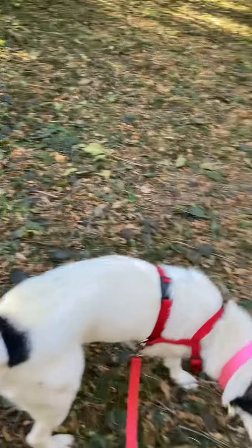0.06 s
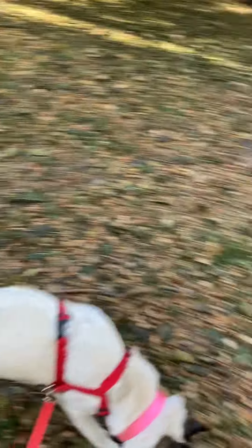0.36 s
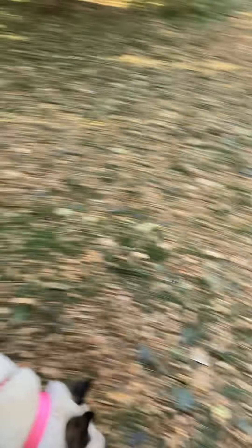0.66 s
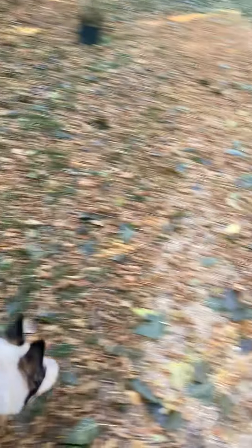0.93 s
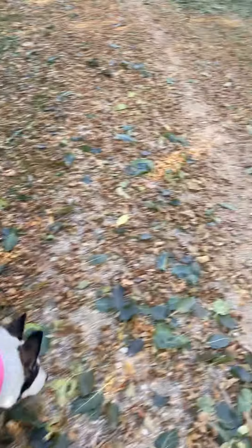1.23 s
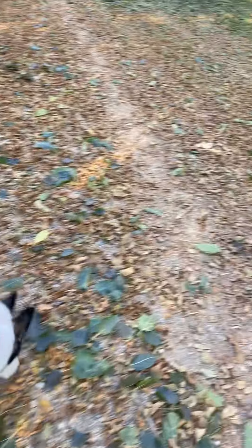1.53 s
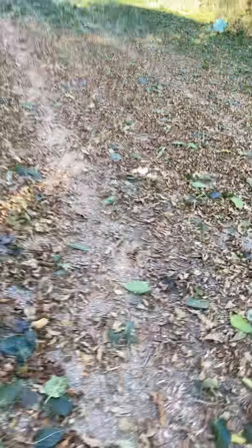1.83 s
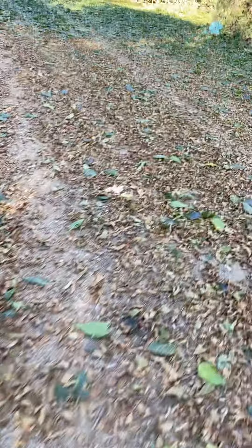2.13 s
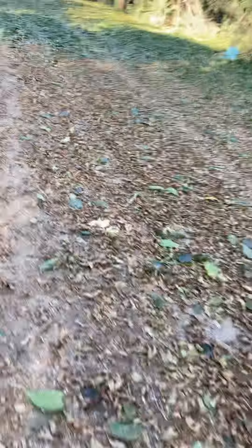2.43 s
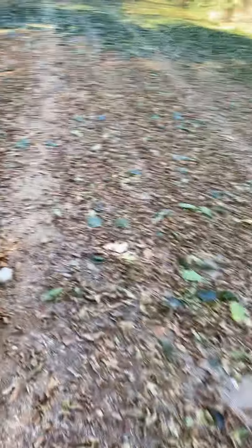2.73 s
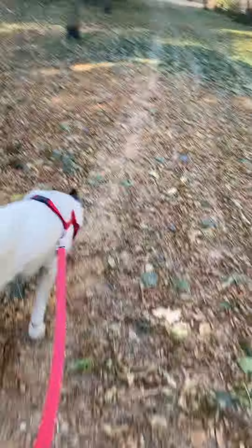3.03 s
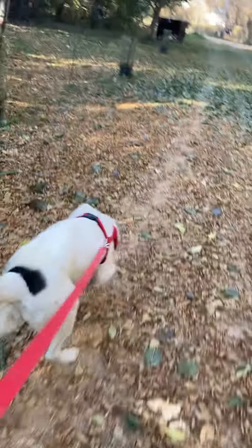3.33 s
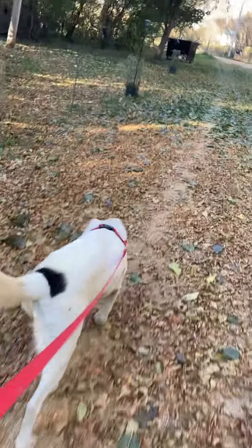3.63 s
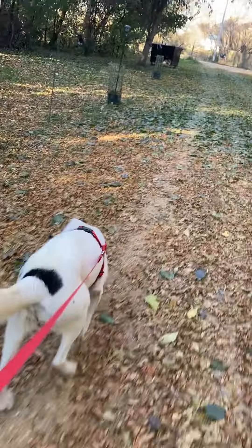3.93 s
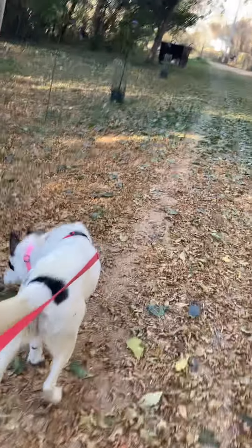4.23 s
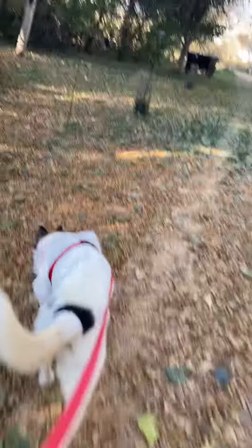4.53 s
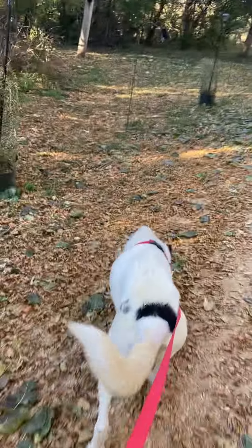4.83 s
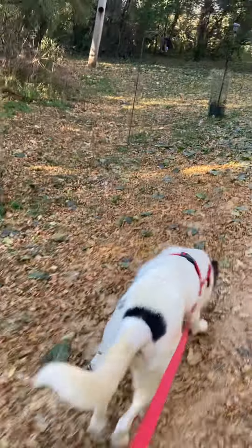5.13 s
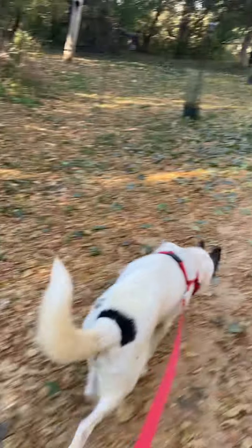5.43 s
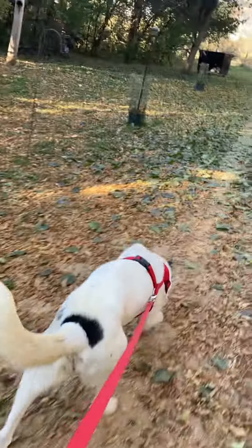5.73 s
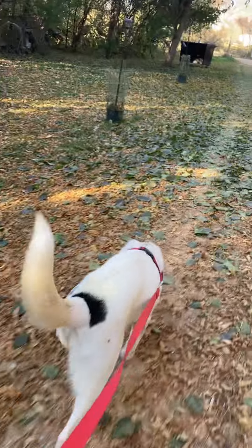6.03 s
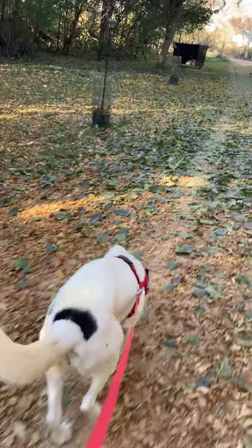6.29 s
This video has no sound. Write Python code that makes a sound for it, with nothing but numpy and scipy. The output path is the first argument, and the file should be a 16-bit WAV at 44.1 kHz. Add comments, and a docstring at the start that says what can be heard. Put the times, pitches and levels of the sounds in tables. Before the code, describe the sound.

Crisp, uneven crunching of shoes and paws in dry leaves runs from start to finish, close to a hand-held phone outdoors. The leaves keep rustling between steps, brittle ones snap, twigs and a leash knock lightly, and heels thud softly on soil. The steps ease briefly past the middle and end with a strong crunch. Underneath are a low wash of air and traffic, a far engine and slight wind flutter.

```python
"""Footsteps of a person and a leashed dog crunch through dry fallen leaves on a woodland path.
Each shoe or paw crushes a crowd of brittle leaves; single leaves snap or cave in, heels and paws thump
on firm soil, and twigs and the leash knock now and then. The litter keeps rustling between steps.
Behind it lie a low wash of air and traffic and a far engine hum. All is heard in stereo from a
hand-held phone, which catches puffs of air as it swings."""
import sys
import numpy as np
from scipy import signal
from scipy.fft import rfft, irfft
from scipy.io import wavfile
from scipy.ndimage import uniform_filter1d

SR = 44100
rng = np.random.default_rng(int(sys.argv[2]) if len(sys.argv) > 2 else 0)


def materialize(psi):
    """Save the field psi as 16-bit PCM at rate SR to the path in sys.argv[1].

    A 1-D psi becomes a single channel; in a 2-D psi each row is a channel.
    """
    bounded = np.clip(np.atleast_2d(psi).T, -1, 1)
    quanta = np.round(bounded * 32767).astype(np.int16)
    wavfile.write(sys.argv[1], SR, quanta)


N = 289296
TIME = np.arange(N) / SR
FREQS = np.arange(N // 2 + 1) * SR / N
TOP_HZ = 16100


def undb(db):
    """Decibels to gain."""
    return 10 ** (np.asarray(db) / 20)


def unit(x):
    """Scale to rms 1."""
    return x / np.sqrt(np.mean(x ** 2))


def over_time(points):
    """Join (time_s, value) points by straight lines."""
    return np.interp(TIME, *np.transpose(points))


def over_freq(points):
    """Join (freq_hz, value) points on a log-frequency axis."""
    hz, value = np.transpose(points)
    return np.interp(np.log(FREQS + 1), np.log(hz), value)


def colour(x, eq):
    """Shape x with an EQ curve that rolls off beyond its end points; rms 1."""
    skirts = np.minimum(FREQS / eq[0][0], 1) ** 2 * np.minimum(eq[-1][0] / (FREQS + 1), 1) ** 2
    return unit(irfft(rfft(x) * undb(over_freq(eq)) * skirts, N))


def bandpass(x, pitch_hz, octaves, highest_hz):
    """Keep a band reaching `octaves` either side of the pitch, capped at highest_hz."""
    band_hz = [pitch_hz / 2 ** octaves, min(pitch_hz * 2 ** octaves, highest_hz)]
    return signal.sosfilt(signal.butter(2, band_hz, "band", fs=SR, output="sos"), x)


def drift(rate_hz):
    """Random modulation that glides to a new value rate_hz times a second; rms 1."""
    hold = max(int(SR / rate_hz), 1)
    stepped = np.repeat(rng.standard_normal(N // hold + 1), hold)[:N]
    return unit(uniform_filter1d(stepped, hold))


def add(out, start_s, sound):
    """Mix a short sound in at start_s."""
    start = int(np.clip(start_s * SR, 0, N - 1))
    out[:, start:start + sound.shape[1]] += sound[:, :N - start]


# Phase by which the left channel leads the right, level across some treble bands: freq_hz, left_lead_rad
STEREO_PHASE = [(200, 0.06), (700, 1), (1200, 1.9), (1600, 0.38), (2500, 0.23), (3700, 2.25), (4600, 2),
                (5300, 3.05), (6100, 3.23), (7800, 5.8), (9400, 6.5), (11300, 9.21), (12800, 9.55),
                (14200, 12.4)]
# How alike left and right sound at each frequency, nearly mono in some treble bands: freq_hz, likeness
STEREO_LIKENESS = [(60, .15), (130, 0.62), (250, 0.98), (800, 0.53), (1350, 0.57), (1800, 0.55),
                   (3500, 0.79), (4700, 0.9), (5500, 1), (6000, 0.98), (6800, 0.27), (8500, 1),
                   (10300, 0.91), (11800, 1), (15000, 0.87)]

def stereo_image(paths):
    """Left and right share the first path, the right lagging; the second is scatter that adds width."""
    likeness = np.clip(over_freq(STEREO_LIKENESS), 0, 1)
    mid, side = rfft(paths) * np.sqrt([(1 + likeness) / 2, (1 - likeness) / 2])
    right_lag = np.exp(-1j * over_freq(STEREO_PHASE))
    return irfft(np.array([mid + side, (mid - side) * right_lag]), N)


# Tone of the outdoor bed: freq_hz, gain_db
AIR_EQ = [(25, -28), (45, 0), (62, -2), (80, 10.5), (110, 2.5), (200, 1.5), (350, -3), (600, -4.5),
          (1000, -21), (2000, -15.5), (5000, -27), (15000, -19.5)]
# Its swells and lulls: time_s, level_db
AIR_LEVEL = [(0, -52), (.4, -56), (1.2, -56.5), (1.55, -52), (2, -53), (2.9, -54), (3.6, -55), (4.1, -54.5),
             (4.7, -55), (6.5, -54.5)]

def outdoor_air(swell_db):
    """A low wash of air and far traffic that swells and lulls."""
    wash = colour(rng.standard_normal((2, N)), AIR_EQ)
    return wash * undb(over_time(AIR_LEVEL) + swell_db * drift(14))


# Partials of the far engine: pitch_hz, relative_db
ENGINE_PARTIALS = [(75, 1.5), (88, 4), (153, -3.5)]
# Fader ride on the engine: time_s, level_db
ENGINE_LEVEL = [(0, -57.5), (1.1, -53.5), (2.4, -59), (3.9, -66.5), (6.5, -62.5)]

def far_engine(pitch_waver, level_waver_db):
    """A distant engine hums, each partial wavering in pitch and level."""
    hum = 0
    for pitch_hz, relative_db in ENGINE_PARTIALS:
        gain = undb(relative_db + level_waver_db * drift(9))
        wavering_hz = pitch_hz * (1 + pitch_waver * drift(9))
        hum = hum + gain * np.sin(2 * np.pi * np.cumsum(wavering_hz) / SR)
    return unit(hum) * undb(over_time(ENGINE_LEVEL))


# Puffs of air as the phone swings with the stride: peak_s, level_db
PUFFS = [(0.6, -65.5), (0.99, -58), (2.0, -69), (2.5, -54), (2.94, -53), (3.5, -54), (3.87, -57),
         (4.17, -52), (4.55, -47.5), (4.69, -52.5), (5.111, -52.5), (5.57, -53), (5.87, -58), (6.18, -53)]

def wind_buffet(draught_db, rise_db_per_s, fall_db_per_s):
    """Low flutter of moving air, unrelated left and right: a draught, and puffs that come fast and ebb."""
    envelope_db = draught_db
    for peak_s, level_db in PUFFS:
        below_peak_db = np.maximum(rise_db_per_s * (peak_s - TIME), fall_db_per_s * (TIME - peak_s))
        envelope_db = np.maximum(envelope_db, level_db - below_peak_db)
    flutter_eq = [(18, -34), (32, -18), (52, 4), (70, 2), (100, -9.5)]
    return colour(rng.standard_normal((2, N)), flutter_eq) * undb(envelope_db)


def burst(t60_s, scatter_db, scatter_t60_s):
    """One impact or fracture along two paths: quick noise, then faint scatter from the leaves around."""
    t = TIME[:2048]
    envelope = undb(-60 * t / t60_s) + undb(scatter_db - 60 * t / scatter_t60_s)
    return rng.standard_normal((2, len(t))) * envelope


def hits(cues, cycles, octaves, scatter_db, scatter_t60_s, highest_hz):
    """Band-passed bursts that die away in `cycles` periods of their pitch, so low ones last longer."""
    out = np.zeros((2, N))
    for start_s, level_db, pitch_hz in cues:
        hit = bandpass(burst(cycles / pitch_hz, scatter_db, scatter_t60_s), pitch_hz, octaves, highest_hz)
        add(out, start_s, hit / abs(hit).max(axis=1, keepdims=True) * undb(level_db))
    return out


# Thumps on the soil: start_s, level_db, pitch_hz
THUMPS = [(.125, -44, 452.5), (.567, -36.5, 809.4), (1.727, -32.5, 269.8), (1.733, -30, 550),
          (1.741, -39, 988), (1.746, -29, 650.3), (1.923, -32, 1035), (2.033, -39, 779), (2.084, -34, 1090),
          (2.359, -39, 388.2), (2.376, -36.5, 533.3), (3.701, -39.5, 719), (3.812, -36, 532),
          (4.018, -35.5, 489.9), (4.513, -35, 593), (5.034, -34, 950), (5.562, -43, 600),
          (6.091, -36.5, 466)]

def soil_thumps():
    """Heels and paws meet firm soil with a short, dull thud."""
    return hits(THUMPS, cycles=6.5, octaves=.52, scatter_db=-10, scatter_t60_s=.079, highest_hz=2500)


# Twig and leash knocks: start_s, level_db, pitch_hz
KNOCKS = [(0.4775, -32, 3000), (0.5477, -24, 2210), (0.5671, -29, 2030), (0.71, -36, 3000),
          (1.2972, -29, 3800), (1.7419, -22, 1790), (1.8595, -31, 2800), (2.0318, -23, 2850),
          (2.2255, -30, 3300), (2.3654, -30, 2130), (2.3784, -28, 3110), (3.154, -31, 1950),
          (3.1812, -28, 2940), (3.703, -39, 2900), (4.0073, -37, 1820), (4.0195, -34, 1750),
          (4.6977, -34.5, 2050), (4.787, -39, 1900), (4.9543, -30, 3000), (4.9738, -29, 3520),
          (5.002, -31, 2120), (5.3043, -33, 1700), (6.0934, -32, 1830)]

def twig_and_leash_knocks():
    """Twigs and the leash knock in the midrange, duller than a breaking leaf."""
    return hits(KNOCKS, cycles=25, octaves=.48, scatter_db=-21, scatter_t60_s=.035, highest_hz=7000)


# Whole curled leaves caving in: start_s, hold_s, level_db, pitch_hz
COLLAPSES = [(0.271, 0.0093, -40, 7900), (0.418, 0.047, -44, 3750), (0.732, 0.019, -37.5, 8520),
             (1.515, 0.023, -53, 1155), (1.537, 0.01, -41, 6540), (1.636, .008, -47, 13000),
             (1.725, 0.023, -40, 2830), (2.034, 0.013, -44, 3010), (2.156, 0.012, -38, 8360),
             (3.264, 0.029, -41, 7400), (3.272, 0.02, -37, 4320), (4.297, 0.02, -33, 5360),
             (4.343, .016, -35.5, 7000), (4.803, 0.051, -42.5, 4810), (4.972, 0.0089, -43, 14000),
             (5.452, 0.017, -48, 4430), (5.709, 0.015, -48, 6600), (5.923, .014, -49.5, 8000),
             (6.389, 0.014, -31.5, 6840), (6.411, 0.054, -37.5, 2856)]

def leaf_collapses(octaves, release_s, rough_db):
    """A leaf caves in abruptly: a short, rough run of fractures around the pitch of its shell."""
    out, t = np.zeros((2, N)), TIME[:N // 40]
    for start_s, hold_s, level_db, pitch_hz in COLLAPSES:
        fractures = rng.standard_normal((2, len(t))) * undb(rough_db * drift(700)[:len(t)])
        shell = unit(bandpass(fractures, pitch_hz, octaves, TOP_HZ))
        envelope = np.exp(-np.maximum(t - hold_s, 0) / release_s)
        add(out, start_s, shell * undb(level_db) * envelope)
    return out


# Single dry leaves breaking: start_s, level_db
SNAPS = [(.1136, -31), (.1326, -33), (.182, -33), (.2379, -26), (.2718, -26), (.2912, -21), (.3371, -27),
         (.387, -27), (.5945, -23), (.601, -17.5), (.6135, -23), (.621, -22), (.6355, -26), (.7355, -24),
         (.792, -24), (.7991, -28), (.917, -26), (.9827, -23), (1.2087, -32), (1.2973, -25), (1.3723, -30),
         (1.3823, -23), (1.498, -20.5), (1.5915, -33), (1.601, -34), (1.6836, -29), (1.7428, -17.5),
         (1.8008, -19), (1.8956, -26), (1.9854, -31), (2.0088, -31), (2.0315, -28), (2.0724, -26),
         (2.0762, -25), (2.159, -26), (2.1944, -23), (2.2638, -25), (2.3401, -24), (2.3505, -22),
         (2.3672, -23), (2.4204, -22), (2.593, -26), (2.6258, -26), (2.7137, -27), (2.7576, -32),
         (2.783, -26.5), (2.8195, -29), (2.912, -25), (3.052, -31), (3.1941, -32), (3.2635, -24),
         (3.2862, -24), (3.8305, -35), (3.9639, -28.5), (4.1614, -33), (4.2085, -25), (4.2976, -27),
         (4.315, -24), (4.3645, -27), (4.4139, -26), (4.8102, -26), (4.8368, -23), (4.851, -23),
         (4.8702, -24), (4.8911, -26), (5.2749, -25), (5.2894, -31), (5.2964, -31), (5.3178, -33),
         (5.3517, -28), (5.4565, -27), (5.7114, -29), (5.7693, -31), (5.9289, -32), (6.3905, -23)]

def leaf_snaps(edge_envelope, pitch_hz, stray_count, stray_db, stray_range_db, stray_octaves):
    """Bent leaves snap on cue; strays break at random times, their level riding on the leaf edges."""
    cues = [(start_s, level_db, pitch_hz) for start_s, level_db in SNAPS]
    for when, size, width in rng.random((stray_count, 3)):
        level_db = 20 * np.log10(edge_envelope[int(when * N)]) + stray_db + stray_range_db * (size - .5)
        stray_hz = pitch_hz / 2 ** (stray_octaves * width ** 2)  # wider leaves snap lower
        cues.append((when * N / SR, level_db, stray_hz))
    return hits(cues, cycles=50, octaves=1.1, scatter_db=-23, scatter_t60_s=.035, highest_hz=10800)


def curled_leaves(low_hz, high_hz, t60_s, size_range_db, count=2400):
    """Stiff curled leaves ring for a moment as they spring free, each at a pitch of its own; rms 1."""
    out, t = np.zeros((2, N)), TIME[:int(t60_s * SR)]
    for when, height, size, side in rng.random((count, 4)):
        pitch_hz = low_hz + (high_hz - low_hz) * height ** 2
        envelope = undb(size_range_db * size - 60 * t / t60_s) * np.sqrt(height)
        ping = np.sin(2 * np.pi * pitch_hz * t) * envelope
        add(out, when * N / SR, np.outer([1, np.sign(side - .5)], ping))
    return unit(out)


def leaf_crackle(breaks_per_s, size_db, colour_db, t60_s, patch_db, patch_rate_hz, flicker_db, bands=18):
    """A crowd of tiny fractures, each with its own size and colour, levelled and then set flickering."""
    onsets = np.flatnonzero(rng.random(N) < breaks_per_s / SR)
    sizes = undb(size_db * np.clip(rng.standard_normal(len(onsets)), -2, 2))
    band_position = np.interp(np.sqrt(FREQS), [0, np.sqrt(TOP_HZ)], [0, bands - 1])
    # a leaf smears each click in time without favouring a pitch
    smear = rfft(burst(t60_s, scatter_db=-9.5, scatter_t60_s=.06), N)
    spectrum = 0
    for band in range(bands):
        # one patch of leaves gives way after another, each strong in its own bands
        band_db = patch_db * drift(patch_rate_hz)[onsets] + colour_db * rng.standard_normal(len(onsets))
        clicks = np.zeros((2, N))
        clicks[:, onsets] = sizes * undb(band_db) * rng.choice([-1, 1], (2, len(onsets)))
        band_shape = np.sqrt(np.maximum(1 - abs(band_position - band), 0))
        spectrum = spectrum + rfft(unit(clicks)) * band_shape
    grains = irfft(spectrum * smear / abs(smear), N)
    power = uniform_filter1d(np.mean(grains ** 2, axis=0), size=900)
    return grains / np.sqrt(np.abs(power) + 1e-9) * undb(flicker_db * drift(90))


# Leaves still stirring between the steps: time_s, level_db
RUSTLE = [(0.0, -49.5), (1.2, -50), (1.65, -51), (2.0, -49.5), (3.1, -52.5), (3.8, -56), (4.2, -53),
          (5.3, -50), (6.35, -57.5)]
# Shoes and paws pressing into the litter: start_s, t60_s, level_db, blades_db, ground_db, sparkle_db
# level_db sets the crisp leaf edges; the last three are relative to it.
TREADS = [(.042, .08, -45, -13, -21.5, 5), (.26, .3, -33, -9.5, -18.5, 2.5), (.385, .54, -36, -7, -20.5, 0),
          (.502, .46, -34, -6.5, -16.5, 1), (.556, .38, -32, -8, -25, -2), (.7, .24, -34, -8.5, -21, 6),
          (.871, .38, -36.5, -2.5, -10, -3), (.937, .38, -32.5, -11, -19, 2),
          (1.085, .9, -40.5, -12.5, -20, 0), (1.258, .37, -44.5, 2, -7.5, -6),
          (1.337, .3, -41.5, -12, -24, 3), (1.409, 0.25, -48.5, -5, -12, -4),
          (1.501, 0.125, -39, -5.5, -11, 4), (1.708, .17, -30, -4.5, -12.5, -8),
          (1.768, .54, -33.5, -6.5, -16, 1), (1.856, 0.221, -44, -3, -9, -3),
          (1.925, .19, -38.5, -5, -20, 3), (2.029, 0.0448, -34, -9, -16, -9),
          (2.06, .07, -37.5, -17, -31, 0), (2.153, 0.0578, -38, -2.5, -15, 3),
          (2.184, .2, -32.5, -7.5, -22.5, 1), (2.319, .18, -34, -5, -19, 7),
          (2.339, .145, -34.5, -1.5, -9.5, 4), (2.357, 1.0, -46, 0, -8.5, 0),
          (2.548, .25, -33.5, -9.5, -19, 4), (2.61, 0.131, -37.5, -12.5, -24, 5),
          (2.692, .12, -39, -6.5, -28, 9), (2.77, .55, -44, -5, -27, 0.5), (2.873, .59, -36, -8, -21, 1),
          (3.145, .38, -48, 1.5, -8, -1), (3.258, .18, -38, -2.5, -14.5, 1),
          (3.313, .61, -31, -4.5, -17, -1), (3.413, 0.2105, -38, -4, -12, -1),
          (3.514, .12, -39, -13, -13.5, -6), (3.884, .15, -40, -4, -25, -3),
          (3.95, .57, -38, -10.5, -28, 2), (4.002, .058, -42, 2, -9, -1), (4.144, .63, -46, -3, -7, -1),
          (4.289, .2, -33.5, -5, -18, 4), (4.397, .21, -38, -4, -23, 0),
          (4.478, .42, -33.5, -4.5, -9.5, -1), (4.625, 0.149, -45, -7, -10, -4),
          (4.691, .104, -42, -1, -8, -3), (4.795, .52, -32, -6, -17.5, 2.5),
          (4.827, 1.07, -34.5, -7.5, -26, -4), (4.984, 0.49, -36, -3.5, -11.5, 0),
          (5.172, 0.0605, -46.5, -6, -21, -5), (5.32, .17, -40.5, -3, -14, -5),
          (5.437, .26, -36.5, -3.5, -16.5, -4), (5.523, .54, -40, -3, -8.5, -1),
          (5.682, 0.888, -42.5, -4, -17, -3), (5.833, 0.0893, -37, -11, -12.5, -6),
          (5.925, .19, -34, -9, -14, -3), (6.049, .56, -38.5, -6, -12.5, -3),
          (6.217, .4, -46.5, -1.5, -11, -5), (6.382, .08, -28, -6, -25, -5),
          (6.394, .42, -23.5, -9.5, -24, -3), (6.475, .36, -34.5, -3.5, -18, -1)]

def tread_envelopes(rustle_blades_db, rustle_ground_db):
    """Envelopes of edges, blades, ground and sparkle: each tread builds and dies away over the rustle."""
    power = undb(over_time(RUSTLE) + np.array([[0], [rustle_blades_db], [rustle_ground_db], [0]])) ** 2
    for start_s, t60_s, level_db, blades_db, ground_db, sparkle_db in TREADS:
        attack_s = .037 * (t60_s / .3) ** .39  # slower treads build up more slowly
        t = TIME[:int((attack_s + t60_s) * SR)]
        load = np.minimum(t / attack_s, 1) ** .68  # abrupt first contact, then growing weight
        press = load * undb(level_db - 60 * np.maximum(t - attack_s, 0) / t60_s)
        add(power, start_s, np.outer(undb([0, blades_db, ground_db, sparkle_db]), press) ** 2)
    return np.sqrt(power)


# Tone of the crisp leaf edges, the midrange leaf blades and the packed ground: freq_hz, gain_db
EDGES_EQ = [(3600, -59), (4700, -3), (5400, -0.5), (6800, 1), (9000, 1.5), (11000, -1.5), (13000, -6),
            (15900, -18)]
BLADES_EQ = [(900, -8.5), (1300, -5), (1700, 2), (2500, -1), (3600, 3), (4500, 0.5), (5600, -60)]
GROUND_EQ = [(90, -49), (200, -4), (350, -7), (600, -2), (1100, -2), (1600, -13)]

def footstep_crunch(edges, blades, ground, sparkle, edges_db, blades_db, ground_db, curled_db):
    """Weight comes onto the leaves; the harder the press, the more of them break each second."""
    breaks_per_s = 2000 * (edges / undb(-42)) ** .5
    leaves = leaf_crackle(breaks_per_s, size_db=5, colour_db=2.5, t60_s=.003,
                          patch_db=3, patch_rate_hz=34, flicker_db=1.07)
    leaves += undb(curled_db) * curled_leaves(low_hz=450, high_hz=7500, t60_s=.035, size_range_db=12)
    crisp = colour(leaves, EDGES_EQ)
    brittle_top = irfft(rfft(crisp) * over_freq([(10500, .039), (13000, 1)]), N)
    # the packed layer underneath gives way more evenly
    packed = rng.standard_normal((2, N)) * undb(2 * drift(130))
    return (undb(edges_db) * (edges * (crisp - brittle_top) + sparkle * brittle_top)
            + undb(blades_db) * blades * colour(leaves, BLADES_EQ)
            + undb(ground_db) * ground * colour(packed, GROUND_EQ))


def scene():
    """Mix crunches, snaps, knocks and thumps over the outdoor bed; trims here add to the table levels."""
    edges, blades, ground, sparkle = tread_envelopes(rustle_blades_db=-4.5, rustle_ground_db=-8.5)
    steps = footstep_crunch(edges, blades, ground, sparkle,
                            edges_db=-.34, blades_db=-.24, ground_db=.1, curled_db=-11)
    steps += leaf_collapses(octaves=.4, release_s=.0048, rough_db=3)
    snaps = undb(2.3) * leaf_snaps(edges, pitch_hz=10500, stray_count=55, stray_db=7,
                                   stray_range_db=5, stray_octaves=1.8)
    knocks = undb(3) * twig_and_leash_knocks()
    thumps = undb(.9) * soil_thumps()
    air = outdoor_air(swell_db=1.2)
    engine = far_engine(pitch_waver=.028, level_waver_db=3.3)
    wind = undb(.5) * wind_buffet(draught_db=-74, rise_db_per_s=200, fall_db_per_s=110)
    return stereo_image(steps + snaps + knocks + thumps + air) + engine + wind


def record(dry):
    """The phone cuts the treble steeply above TOP_HZ."""
    return signal.sosfilt(signal.ellip(10, .2, 70, TOP_HZ, fs=SR, output="sos"), dry)


dry = scene()
out = record(dry)
materialize(out)
```